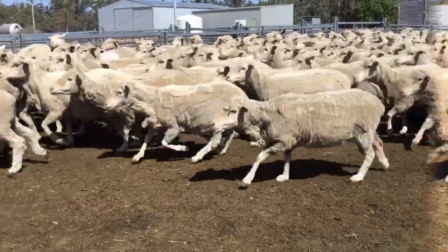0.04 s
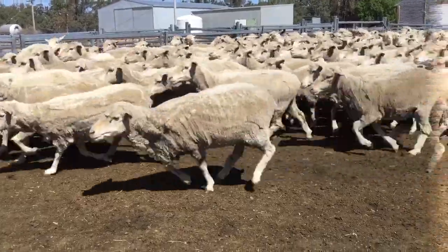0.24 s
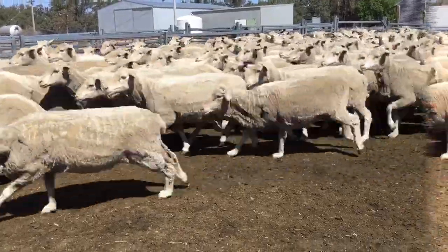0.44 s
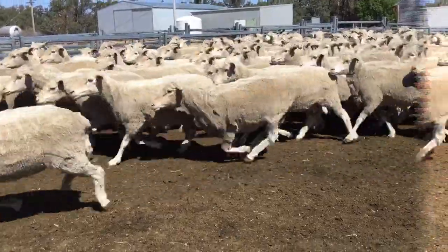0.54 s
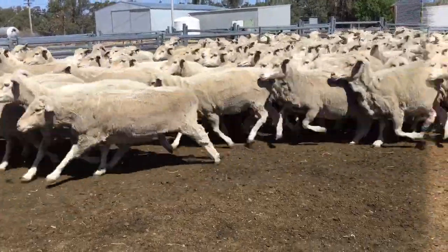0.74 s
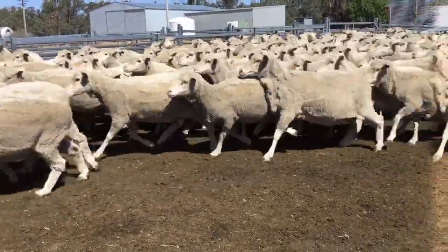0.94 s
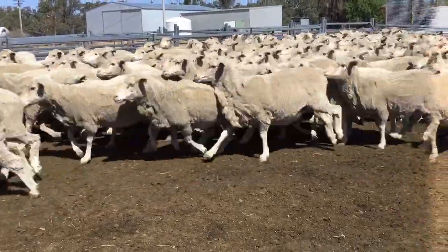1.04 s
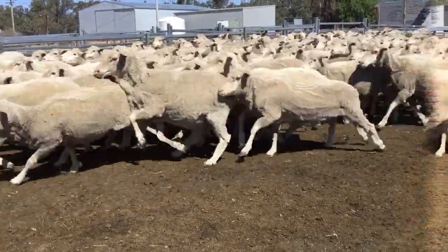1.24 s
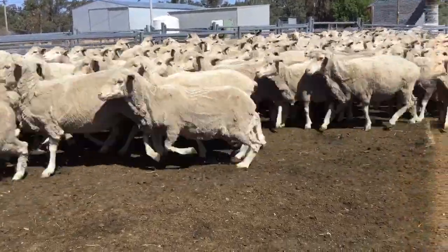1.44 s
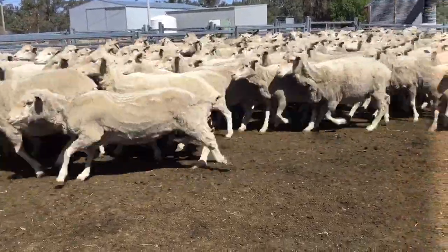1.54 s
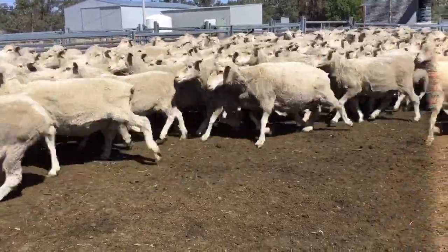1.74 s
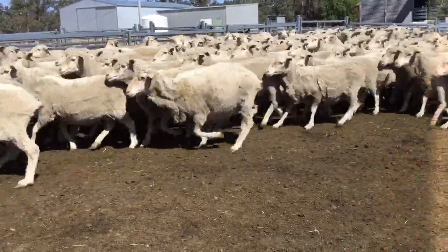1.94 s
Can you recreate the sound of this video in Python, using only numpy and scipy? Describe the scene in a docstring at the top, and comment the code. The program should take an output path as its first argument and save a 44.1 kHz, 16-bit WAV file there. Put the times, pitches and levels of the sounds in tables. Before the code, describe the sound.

One long sheep bleat across an open yard, over low, gusty wind rumble.

```python
"""Wind rumbles on the microphone in an open yard and buffets it in dull lumps of turbulence.
Across the yard a sheep gives one long, thin bleat, its vocal folds sounding through throat, mouth and
nose: a catch, a rough quavering start, then a clean held note that sags at the end. Sheds and fences
echo it faintly. Hooves of the running flock scuff the dirt, flick grit and snap a stalk nearby;
far off lie the shuffle of the rest and one faint chirp."""
import sys
import numpy as np
from scipy import signal
from scipy.io import wavfile
from scipy.ndimage import uniform_filter1d

SR = 44100
rng = np.random.default_rng(int(sys.argv[2]) if len(sys.argv) > 2 else 0)


def generate_wav(sig):
    """Save sig (samples, or channels by samples) to the path in sys.argv[1] as 16-bit PCM at SR."""
    pcm = np.round(np.clip(np.atleast_2d(sig).T, -1, 1) * 32767).astype(np.int16)
    wavfile.write(sys.argv[1], SR, pcm)


N = 88200
T = np.arange(N) / SR

# The sheep's vocal folds, across the yard: (time [s], pitch [Hz])
BLEAT_PITCH = [(.425,223),(.505,219.5),(.528,225.5),(.553,215.5),(.578,231),(.594,238),(.611,230),(.638,245),(.676,239.5),(.694,248.5),(.72,253),(.76,251.5),(.782,258.5),(.815,256),(.91,261.5),(.93,258),(.99,264),(1.04,264.5),(1.06,262),(1.125,262.5),(1.14,265),(1.19,263),(1.26,239)]
# Effort behind the call: (time [s], level [dB])
BLEAT_EFFORT = [(.415,-87.5),(.435,-69.5),(.462,-74.5),(.475,-84),(.498,-84),(.509,-51.5),(.528,-55.5),(.55,-59),(.58,-52.5),(.64,-50.5),(.675,-51.5),(.78,-50.5),(.99,-47.5),(1.11,-52),(1.18,-53.5),(1.24,-63.5),(1.275,-74)]
# Unevenness of the folds' cycles: (time [s], roughness [0-1])
BLEAT_ROUGHNESS = [(.52,.22),(.59,.26),(.72,.17),(.85,.12),(1.15,.12),(1.25,.2)]
# Throat and nose response at the reference pitch: (frequency [Hz], level [dB])
THROAT_RESPONSE = [(250,-6),(750,-5),(1280,-44),(1580,-26),(1830,-15),(2400,-21),(2650,-7.5),(3120,-8),(3400,-12),(3660,-10.5),(3950,-21.5),(4400,-35),(4700,-28.5),(5300,-41),(6000,-38.5),(6550,-33),(7400,-52.5)]
# Low resonance of the open mouth: (time [s], centre [Hz], level [dB])
MOUTH_RESONANCE = [(.53,888,-3.5),(.6,940,-4),(.76,986,-1.5),(.88,965,-4.5),(1.08,894,-2),(1.22,949,6)]
# Lower and upper resonances that the tongue moves: (time [s], centre [Hz], level [dB])
TONGUE_LOWER = [(0.521,2150,-1),(.6,2135,-1),(.72,2087,-1),(.9,2145,-0.5),(1.101,2050,-4.5),(1.229,2130,1.5)]
TONGUE_UPPER = [(.52,2740,7.5),(.6,2837,3),(.74,2840,5),(.9,2900,-1),(1.15,2900,-4)]
# The deepening valley that the nose cuts between those two: (time [s], gain [dB])
NOSE_VALLEY = [(.8,0),(1.1,-10.5)]
REFERENCE_HZ, THROAT_FOLLOWS_PITCH = 290, .17
NOSE_HZ, NOSE_WIDTH_HZ = 2420, 250
JITTER, QUAVER_JITTER = .0024, .013


def bleat():
    """A sheep across the yard: vocal-fold harmonics shaped by throat, mouth, tongue and nose."""
    rough = in_time(BLEAT_ROUGHNESS)
    pitch = in_time(BLEAT_PITCH) * (1 + JITTER * drift(42) + QUAVER_JITTER * rough * drift(150))
    phase = 2 * np.pi * np.cumsum(pitch) / SR
    stretch = (pitch / REFERENCE_HZ) ** THROAT_FOLLOWS_PITCH
    shimmer = drift(140)
    voice = 0
    for harmonic in range(1, 30):
        hz = harmonic * pitch
        throat = from_db(at_hz(THROAT_RESPONSE, hz / stretch))
        mouth = resonance(MOUTH_RESONANCE, hz, width_hz=140)
        lower = resonance(TONGUE_LOWER, hz, width_hz=237)
        upper = resonance(TONGUE_UPPER, hz, width_hz=230)
        nose = from_db(in_time(NOSE_VALLEY) * np.exp(-((hz - NOSE_HZ) / NOSE_WIDTH_HZ) ** 2))
        tract = np.sqrt(throat ** 2 + mouth ** 2 + lower ** 2 + upper ** 2) * nose
        flutter = 1 + .5 * rough * (shimmer + drift(82))
        voice += tract * flutter * np.cos(harmonic * phase + rng.normal(0, .28))
    sounding = (T > BLEAT_EFFORT[0][0]) & (T < BLEAT_EFFORT[-1][0])
    return (voice + rasp(phase, rough)) * from_db(in_time(BLEAT_EFFORT)) * sounding


# High resonances that the sheep's breath excites: (centre [Hz], relative level [dB])
RASP_RESONANCES = [(4680,-30),(6550,-32.5)]


def rasp(phase, rough, throat_db=-21.5, width_hz=520):
    """Air hisses through the throat on each pulse of the folds, more when the voice is rough."""
    hiss = from_db(throat_db) * banded_noise(THROAT_RESPONSE)
    for hz, db in RASP_RESONANCES:
        band = butter(rng.standard_normal(N), [hz - width_hz / 2, hz + width_hz / 2], "band")
        hiss += from_db(db) * rms_one(band)
    return hiss * (1 + .5 * np.cos(phase)) * (.33 + 3 * rough)


def yard_echoes(voice, t60_s=.29):
    """Sheds and fences scatter the call back to the microphone; scaled to the call's own level."""
    lags_s = rng.uniform(.015, .25, 60)
    echoes = np.zeros(N)
    for lag, sign in zip(lags_s, rng.choice([-1, 1], len(lags_s))):
        add(echoes, lag, sign * from_db(-60 * lag / t60_s) * voice)
    return rms_one(echoes) * np.std(voice)


# Wind right on the microphone: (time [s], length [s], level [dB], brightness [Hz])
WIND_BUFFETS = [(.028,0.031,-37,244),(.085,0.022,-34.5,134),(0.18,0.023,-32,179),(0.225,0.037,-36,150.3),(0.339,0.028,-37.5,215),
                (0.404,0.019,-26.5,223),(0.435,0.073,-26,219),(0.485,0.019,-17.5,590),(0.505,0.015,-21.5,762),(0.519,0.018,-23.5,481.5),(.545,0.18,-33,141),
                (0.632,0.014,-25,347),(.664,0.017,-29.5,191),(0.684,0.02,-25,253),(.712,0.029,-30,120),(.765,0.1,-34,205),(0.815,0.0087,-24,390),
                (0.844,0.014,-23,286),(0.881,0.013,-18,393),(0.918,0.03,-25,310),(0.933,0.029,-21,242),(.968,0.025,-25,294),(1.002,0.016,-29,502),(1.022,0.051,-33.5,222),
                (1.095,0.043,-24.5,185),(1.13,0.029,-22,324),(1.158,0.017,-22.5,318),(1.187,0.048,-39,193),(1.258,0.02,-21,279),(1.3,0.033,-22,392),(1.334,0.032,-22.5,235),
                (1.38,0.02,-22.5,309),(1.429,0.023,-22.5,215),(1.503,0.009,-25,250),(1.556,0.0051,-26.5,746),(1.567,0.017,-26,301),(1.585,0.025,-28.5,93),(1.703,0.034,-30,176),(1.8,0.013,-33,247),(1.885,0.046,-40.5,114)]


def wind_buffets(attack_s=.00375, release_s=.0054):
    """Short bursts of turbulence strike the microphone as dull lumps."""
    out, t = np.zeros(N), T[:SR // 5]
    for start, length, db, hz in WIND_BUFFETS:
        eddies = microphone_port(rng.standard_normal(2 * len(t)), hz)[len(t):]
        local_power = uniform_filter1d(uniform_filter1d(eddies ** 2, size=600), size=400)
        even_eddies = eddies / np.sqrt(local_power + 1e-20)
        attack = 1 - np.exp(-(t / attack_s) ** 2)
        release = 1 / np.cosh(np.clip((t - length) / release_s, 0, 20))
        add(out, start - attack_s / 2, from_db(db) * attack * release * even_eddies)
    return out


# Single eddies on the microphone: (time [s], peak level [dB], brightness [Hz])
WIND_POPS = [(0.231,-24,260),(0.35,-24,320),(0.441,-14,270),(0.4893,-15.5,1000),(0.506,-14.5,1060),(.626,-24.5,950),(0.644,-18,330),(.707,-16,277),(0.8143,-12.5,780),(0.8205,-26,1000),(.852,-21.5,330),(.876,-10.5,493),(0.886,-16.5,430),(.902,-27,450),(.916,-15.5,680),(0.936,-17.5,434),(.951,-23,500),(0.9801,-21,560),(1.0045,-32,640),(1.041,-29,500),(1.1554,-21.5,540),(1.170,-14.5,306),(1.269,-14.5,330),(1.301,-18,450),(1.3153,-20,560),(1.389,-19,360),(1.432,-24.5,520),(1.507,-23.5,430),(1.561,-26.5,900)]


def wind_pops():
    """Each eddy hits the port as one pressure impulse, a sharp pop."""
    out = np.zeros(N)
    for time, db, hz in WIND_POPS:
        pop = microphone_port(signal.unit_impulse(SR // 5), hz)
        add(out, time - 1 / (2 * hz), from_db(db) * pop / np.abs(pop).max())
    return out


def microphone_port(pressure, bright_hz, bottom_hz=60, top_hz=1490):
    """Turbulence at the microphone port: faster eddies sit higher in pitch, the deep bass is cut."""
    eddies = butter(pressure, bright_hz, "low")
    eddies = butter(eddies, .7 * bright_hz, "low")
    eddies = butter(eddies, .12 * bright_hz, "high", order=1)
    eddies = butter(eddies, top_hz, "low", order=4)
    return butter(eddies, bottom_hz, "high", order=3)


# Colour of the steady wind at the microphone: (frequency [Hz], relative density [dB])
RUMBLE_SPECTRUM = [(22,-35),(35,-26.5),(55,0.5),(95,2.5),(170,1),(280,-12.5),(450,-23),(800,-55.5)]
# Its rise and fall: (time [s], level [dB])
RUMBLE_SWELL = [(0,-45.5),(.12,-47.5),(.23,-43),(.3,-51),(.5,-29.5),(.8,-35.5),(.97,-34.5),(1.2,-34),(1.45,-36),(1.66,-48),(2,-43.5)]


def wind_rumble():
    """Wind flowing over the microphone keeps up a low rumble."""
    return from_db(in_time(RUMBLE_SWELL)) * banded_noise(RUMBLE_SPECTRUM)


# Hooves on the dirt nearby: (time [s], level [dB], centre [Hz], decay [s])
HOOF_SCUFFS = [(.301,-60,1890,0.0022),(.756,-60,1500,0.0029),(1.443,-50,1980,0.003),(1.48,-64,2450,0.0066),(1.934,-51.5,830,0.0083),(1.941,-55.5,1860,0.0024)]
# Grit flicked up nearby: (time [s], level [dB], centre [Hz])
GRIT_TICKS = [(0.239,-62,6260),(0.267,-56.5,5270),(0.675,-55.5,7000),(1.161,-65,10060),(1.507,-62,6500),(1.531,-67.5,11000),(1.79,-61,11000),(1.804,-57,5000),(1.833,-55,5000)]
SCUFF_SPREAD, GRIT_SPREAD = 1.35, 1.8  # ratio of upper band edge to centre
GRIT_DECAY_S, GRAINS_PER_S, CRACKLE_DB = .0016, 130, -81


def hooves():
    """Scuffs and broader, shorter grit ticks nearby; fine crackle of dirt from the whole flock."""
    out, t = np.zeros(N), T[:SR // 10]
    scuffs = [(*scuff, SCUFF_SPREAD) for scuff in HOOF_SCUFFS]
    ticks = [(*tick, GRIT_DECAY_S, GRIT_SPREAD) for tick in GRIT_TICKS]
    for start, db, hz, decay, spread in scuffs + ticks:
        dirt = butter(rng.standard_normal(2 * len(t)), [hz / spread, hz * spread], "band")[len(t):]
        add(out, start, from_db(db) * rms_one(dirt) * np.exp(-t / decay))
    grains = (rng.random(N) < GRAINS_PER_S / SR) * rng.standard_normal(N)
    crackle = butter(grains, [2000, 9000], "band", order=1)
    return out + from_db(CRACKLE_DB) * rms_one(crackle)


def stalk_snap(time_s=.332, peak_db=-42, centre_hz=2300):
    """A dry stalk breaks under a hoof: one broad click with no ring."""
    fracture = signal.unit_impulse(N, int(time_s * SR)) + 1e-18
    click = butter(fracture, [centre_hz / GRIT_SPREAD, centre_hz * GRIT_SPREAD], "band")
    return from_db(peak_db) * click / np.abs(click).max()


# Colour of the far flock and open air: (frequency [Hz], relative density [dB])
FAR_SPECTRUM = [(200,5),(500,3.5),(900,-9),(1600,-11),(3000,-14.5),(4500,-18),(6500,-22),(10000,-27.5),(15500,-30)]
# Their level at the microphone: (time [s], level [dB])
FAR_LEVEL = [(0,-62),(.3,-60),(.6,-61),(1.3,-61.5),(1.55,-62.5),(1.68,-61),(1.76,-60.5),(1.86,-59),(2,-61)]


def far_flock_and_air(flicker_db=1.1):
    """Distant shuffling and open air merge into a soft wash whose level flickers."""
    return from_db(in_time(FAR_LEVEL) + flicker_db * drift(11)) * banded_noise(FAR_SPECTRUM)


def far_chirp(time_s=1.425, half_length_s=.03, peak_db=-73, centre_hz=6350):
    """A brief, slightly buzzy falling note, like a distant bird."""
    fall_hz_per_s, waver_hz = 9000, 200
    pitch = centre_hz - fall_hz_per_s * (T - time_s) + waver_hz * drift(300)
    envelope = np.exp(-((T - time_s) / half_length_s) ** 2)
    return from_db(peak_db) * envelope * np.sin(2 * np.pi * np.cumsum(pitch) / SR)


def resonance(track, hz, width_hz):
    """Gain of a moving resonance at the given frequencies."""
    times, centres, levels = np.transpose(track)
    detuning = 2 * (hz - np.interp(T, times, centres)) / width_hz
    return from_db(np.interp(T, times, levels)) / (1 + detuning ** 2)


def banded_noise(spectrum):
    """Half-octave noise bands following a spectrum and fading beyond its ends; rms 1."""
    out, white = 0, rng.standard_normal((2, 2 * N))
    edges = 20 * 2 ** np.arange(0, 10.1, .5)
    for k, band in enumerate(zip(edges, edges[1:])):
        hz = np.sqrt(band[0] * band[1])
        skirt = min(1, hz / spectrum[0][0], (spectrum[-1][0] / hz) ** 4)
        out += butter(white[k % 2], band, "band")[N:] * skirt * from_db(at_hz(spectrum, hz))
    return rms_one(out)


def from_db(db):
    """Decibels to gain."""
    return 10 ** (np.asarray(db) / 20)


def rms_one(x):
    """Scale to rms 1."""
    return x / np.sqrt(np.mean(x ** 2) + 1e-20)


def in_time(rows):
    """A control curve at every sample."""
    return np.interp(T, *np.transpose(rows))


def at_hz(spectrum, hz):
    """Read a spectrum on a log-frequency axis."""
    frequencies, db = np.transpose(spectrum)
    return np.interp(np.log(hz), np.log(frequencies), db)


def butter(x, hz, kind, order=2):
    """Causal Butterworth filter."""
    sections = signal.butter(order, np.clip(hz, 10, .45 * SR), kind, fs=SR, output="sos")
    return signal.sosfilt(sections, x)


def drift(rate_hz):
    """Random wander below the given rate; rms 1."""
    return rms_one(butter(rng.standard_normal(2 * N), rate_hz, "low")[N:])


def add(out, start_s, sound):
    """Mix a sound in at a time."""
    i = max(int(start_s * SR), 0)
    out[i:i + len(sound)] += sound[:max(N - i, 0)]


def scene():
    """One microphone in the yard: the bleat and its echoes, the wind, the flock, the distance."""
    voice = bleat()
    echoes = from_db(-19) * yard_echoes(voice)
    wind = butter(wind_buffets() + wind_pops(), hz=60.8, kind="high", order=4) + wind_rumble()
    return (voice + echoes + wind + hooves() + stalk_snap() + far_flock_and_air() + far_chirp())[None]


def record(dry, cutoff_hz=15850):
    """The top is cut steeply."""
    return signal.sosfilt(signal.ellip(10, .1, 80, cutoff_hz, fs=SR, output="sos"), dry)


dry = scene()
out = record(dry)
generate_wav(out)
```